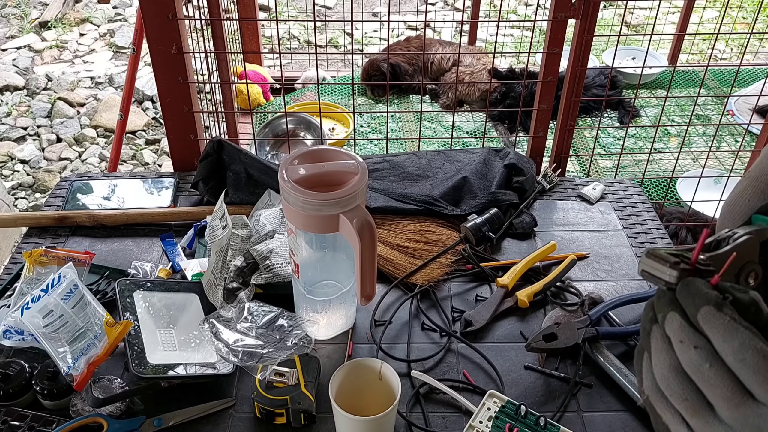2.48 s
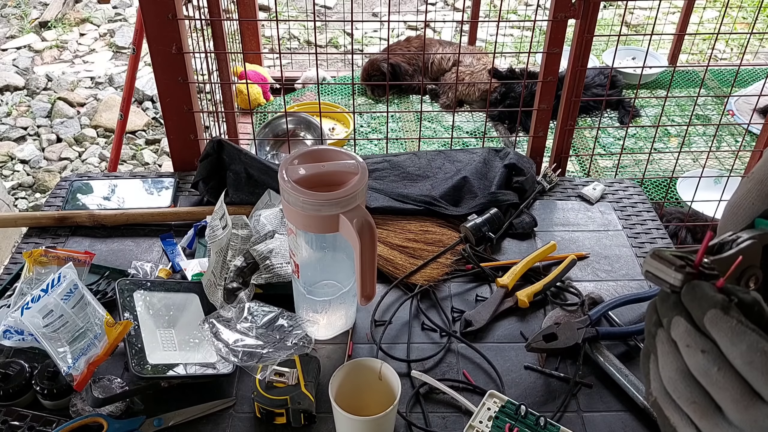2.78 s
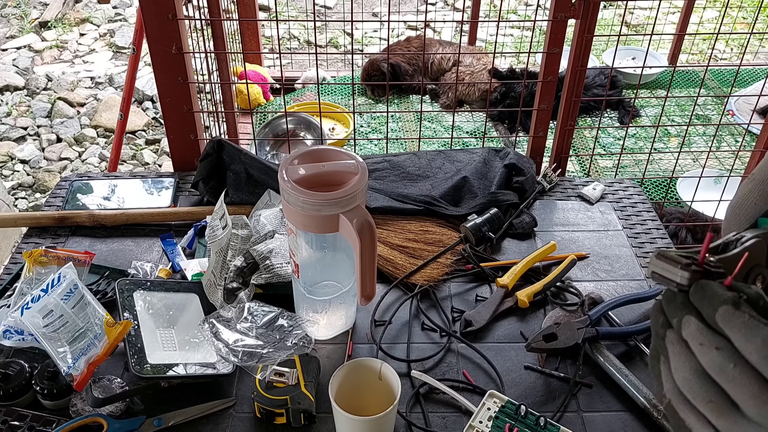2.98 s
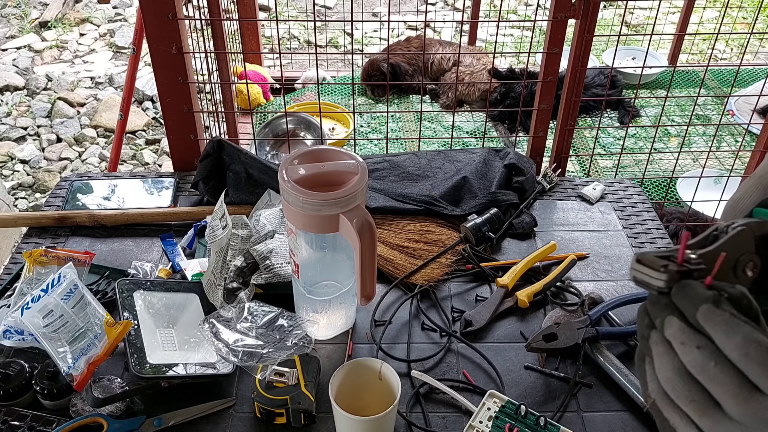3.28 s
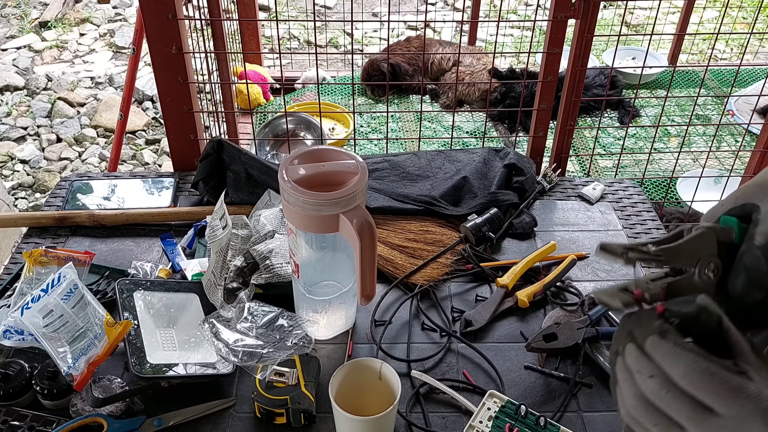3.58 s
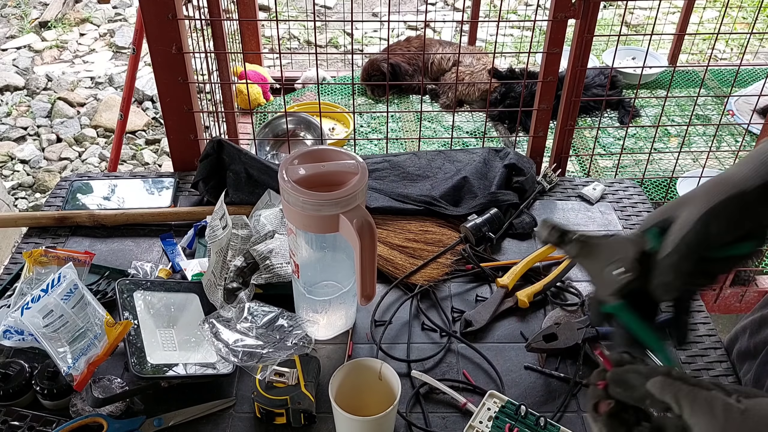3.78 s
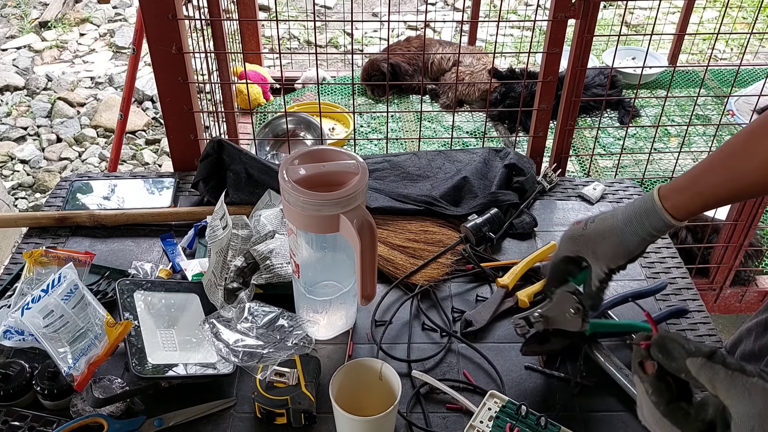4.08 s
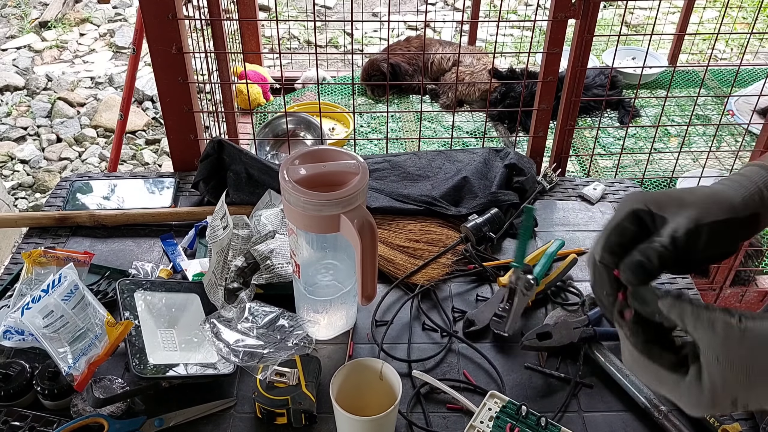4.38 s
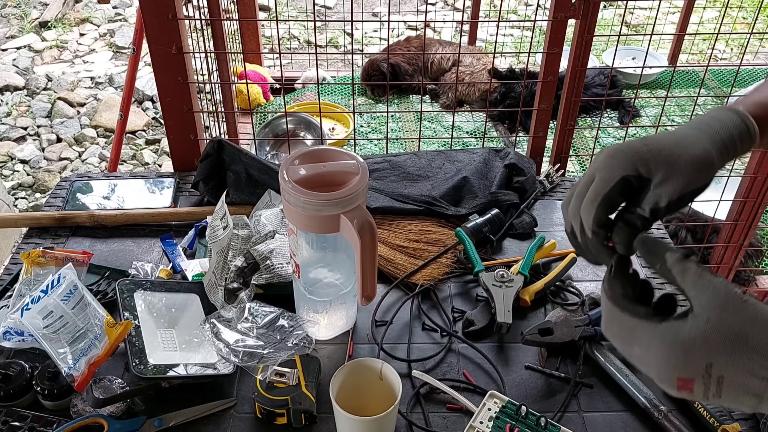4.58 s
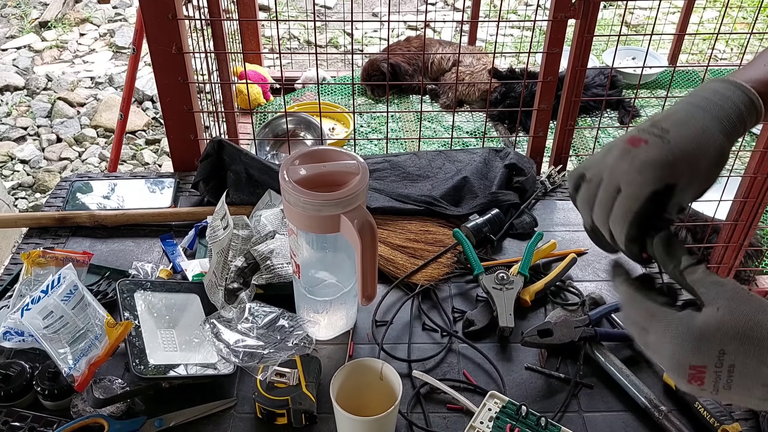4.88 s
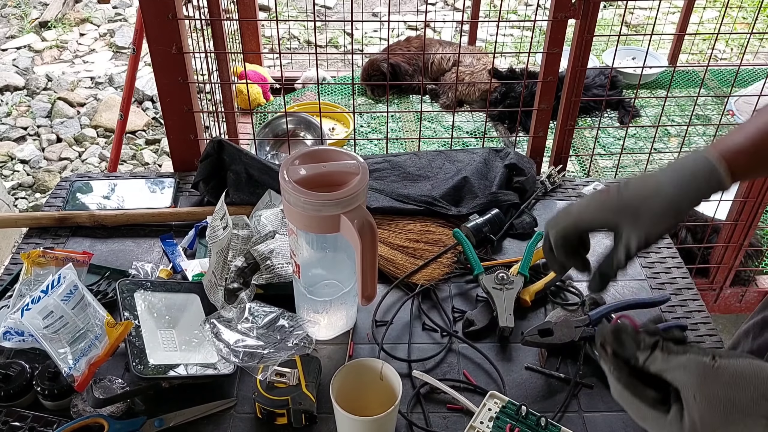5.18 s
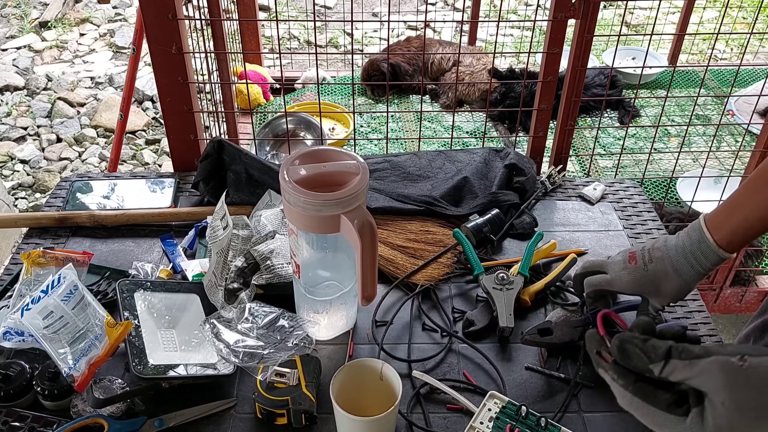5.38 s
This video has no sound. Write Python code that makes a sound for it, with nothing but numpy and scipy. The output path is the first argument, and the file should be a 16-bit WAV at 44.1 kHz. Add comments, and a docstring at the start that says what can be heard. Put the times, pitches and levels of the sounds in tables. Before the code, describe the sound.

A quiet porch outdoors, heard close in stereo, with soft distant rumble, airy wash, a faint low hum and a very high pulsing insect buzz that swells in phrases. Faint far whistles open the scene. From about 1 s a wire stripper gives tiny metallic ticks, quickening at 1.3 to 1.5, then a short tear and a loud, dry crack at 1.6 with spring jangle and bright reflections. A distant bird pips six times from 1.9 to 2.6. More clicks come at 3.3 to 3.7, then a second, more crackling snap at 3.75. At 4.2 steel touches steel lightly; at 4.34 the tool drops with a hollow plastic thud and rattle. Cable scrapes in gritty strokes at 4.4 to 4.8, with another bump at 4.8. Faint gliding calls return around 5 to 5.7, and at 5.88 pliers clink amid quick table knocks.

```python
"""A wire stripper bites and snaps twice under a porch roof, then is dropped on a cluttered plastic table.
Cracks are short noise bursts with jaw modes; blows excite table modes, a decaying thud and rattling noise.
A cable drags by stick and slip, and steel pliers clink as modal rings when they are picked up.
Behind: a bird and far calls of gliding tones, a shrill insect of pulsed noise, distant rumble, wash and hum."""
import sys
import numpy as np
from scipy import signal
from scipy.fft import rfft, irfft
from scipy.io import wavfile
from scipy.ndimage import uniform_filter1d

SR = 44100
rng = np.random.default_rng(int(sys.argv[2]) if len(sys.argv) > 2 else 0)


def generate_wav(signal):
    """Clip the signal to [-1, 1] and save it as 16-bit WAV at the path in sys.argv[1]."""
    frames = np.transpose(np.atleast_2d(signal))
    scaled = np.clip(frames, -1, 1) * 32767
    pcm = np.round(scaled).astype(np.int16)
    wavfile.write(sys.argv[1], SR, pcm)


N = 261513
T = np.arange(N) / SR
RING = T[:SR * 3 // 4]  # time axis of one decaying sound, s
EDGE_HZ = 15900  # upper band limit

# full squeezes, timed as the jaws fly open: t/s, relative levels of snap/dB, tearing/dB, spring jangle/dB
STRIPS = [(1.615, 1.5, -5, -31.5), (3.7509, 2, 1, -35.5)]
# spectrum of a sharp crack: f/Hz, relative density/dB per Hz
CRACK_SPECTRUM = [(150, 5), (600, -6), (1500, -11), (3000, -6.5), (4700, -2), (6200, 1), (9000, 1.5),
                  (12500, 5.5), (15500, 4)]
# modes of the stripper's steel jaws: f/Hz, relative level/dB, t60/s
JAW_MODES = [(1707, -13, .12), (2245, 2, .15), (2299, -9, .21), (2440, -18, .089), (2896, -21, .2),
             (3320, -14, .1), (3420, -11, .1), (4355, -12, .16), (4480, -13, .1), (5200, -16, .1),
             (6051, -18, .16), (6304, -14, .13), (6613, -10, .14), (7671, -19, .13), (8040, -17, .1),
             (9410, -18, .19), (12680, -17, .16), (14740, -24, .13)]
# modes of the plastic table top: f/Hz, relative level/dB, t60/s
TOP_MODES = [(117, -15, 0.056), (124.8, -5.5, 0.46), (157.3, -6, 0.33), (241.6, -4.5, 0.37),
             (304.5, -8, 0.26), (323.5, -5.5, 0.17), (381, -8.5, 0.22), (428, -5, 0.15), (466.3, -12, 0.26),
             (530, -28, 0.41), (571, -19.5, 0.48), (649, -11, 0.107), (702, -17, 0.16), (932, -23, 0.11),
             (1060, -43, 0.083), (1368, -40, 0.13)]


def amp(db):
    """Logarithmic level: decibels to an amplitude ratio."""
    return 10 ** (np.asarray(db) / 20)


def balance(right_db):
    """Level difference between ears: lowers the left and raises the right by right_db."""
    return amp([[-right_db], [right_db]])


def damped(t, t60):
    """Exponential decay: the amplitude falls by 60 dB in t60 seconds."""
    return np.exp(-np.log(1000) * t / t60)


def evened(x):
    """Root-mean-square normalization: scales to rms 1."""
    return x / np.sqrt(np.mean(x ** 2) + 1e-20)


def read(points, hz):
    """Logarithmic pitch scale: interpolates a table along log frequency."""
    f, value = np.transpose(points)
    return np.interp(np.log(hz + 1), np.log(f + 1), value)


def curve(rows, column=1):
    """Envelope: a gain that follows one dB column of a table in time."""
    rows = np.array(rows)
    return amp(np.interp(T, rows[:, 0], rows[:, column]))


def add(mix, s, sound):
    """Superposition: adds a sound to the mix from time s."""
    part = mix[:, max(round(s * SR), 0):][:, :sound.shape[-1]]
    part += sound[..., :part.shape[1]]


def noise(colour, size, tilt_db=0):
    """Partial coherence: coloured stereo noise whose channels agree in the bass and part in the treble."""
    # likeness of the two channels: f/Hz, correlation
    coherence = [(100, 0.94), (300, 0.77), (700, 0.46), (1500, 0.057), (4000, 0.11), (12000, 0.031)]
    hz = np.fft.rfftfreq(size, 1 / SR)
    left, other = rfft(rng.standard_normal((2, size)))
    same = np.clip(read(coherence, hz), -1, 1)
    right = same * left + np.sqrt(1 - same ** 2) * other
    gain = amp(read(colour, hz) + tilt_db * np.log2(hz + 1))  # tilt in dB per octave
    gain = gain * (hz < EDGE_HZ) * (hz > 20)
    return evened(irfft(np.array([left, right]) * gain, size))


def wander(rate):
    """Random modulation: slow sines up to rate (Hz) with random phases sum to a motion of rms 1."""
    rates = np.geomspace(rate / 10, rate, 20)
    return evened(sum(np.sin(2 * np.pi * (f * T + rng.random())) / np.sqrt(f) for f in rates))


def fade(x, t60s):
    """Frequency-dependent damping: each band dies at its own speed."""
    hz, t, bands = signal.stft(x, SR, nperseg=256)
    decay = amp(-60 * t / read(t60s, hz)[:, None])
    return signal.istft(bands * decay, SR)[1][:, :x.shape[1]]


def ring(modes, weights_db, spread):
    """Modal superposition: damped sines; spread sets how far their phases part between the ears."""
    hz, db, t60 = np.transpose(modes)[:, :, None]
    phase = spread * np.sqrt(hz / hz.max()) * rng.standard_normal((2, len(modes), 1))
    level = amp(db + weights_db[:, None])
    return (level * damped(RING, t60) * np.sin(2 * np.pi * hz * RING + phase)).sum(1)


def porch(x, build_s=0.0018):
    """Reverberation: dense bright reflections from roof and clutter swell for a moment, then die."""
    # spectrum of the reflections: f/Hz, relative density/dB
    room_colour = [(200, -14), (1200, -10), (3000, 1), (4600, 3.5), (6000, -3.5), (8000, 6), (15000, 1)]
    # decay of the reflections: f/Hz, t60/s
    room_t60 = [(300, 0.18), (2000, 0.35), (5000, 0.31), (10000, 0.2), (15000, 0.26)]
    tail = fade(noise(room_colour, size=len(RING)), room_t60) * (1 - np.exp(-RING / build_s))
    return signal.fftconvolve(x, tail / np.linalg.norm(tail[0]), axes=1)


def stripper(crack_db=-33, right_db=1.0, rise_s=0.00032, room_right_db=-0.1, fibres_per_s=400, smooth=0.44):
    """Sudden release of strain: jaws click, insulation tears in a crackle, jaws crack open, handles kick."""
    # light clicks of the jaws and hinge: t/s, relative level/dB
    jaw_clicks = [(.982, -33), (1.319, -27), (1.3417, -17.5), (1.3917, -17.5), (1.41, -15), (1.4587, -22),
                  (1.573, -25), (2.874, -38), (3.339, -25.5), (3.361, -26), (3.374, -27), (3.3847, -23),
                  (3.533, -23), (3.545, -8.5), (3.6998, -15), (3.73, -8), (4.1632, -18.5), (4.3937, -17)]
    # recoil of the handles in the glove: t/s, level/dB, f/Hz, t60/s
    recoils = [(1.615, -23, 74.6, 0.062), (1.616, -16.5, 228, 0.011), (3.531, -31.5, 282, 0.027),
               (3.532, -37.5, 1140, 0.0096), (3.5439, -31, 297, 0.031), (3.7486, -24.5, 74, 0.068)]
    click_s, click_room_db = 0.0016, -5.5
    snap_s, snap_room_db = 0.0012, 0.5
    tear_s, tear_fade_s, tear_room_db = 0.03, 0.023, -3.5  # the tear starts tear_s before the snap
    jaw_ring_db, jaw_damped_hz, jaw_damped_db = -29.5, 3500, -20.5
    out, t = np.zeros((2, N)), RING[:SR // 20]
    rise = 1 - np.exp(-t / rise_s)

    click_shape = rise * np.exp(-t / click_s)
    bursts = [(s, db, click_shape, click_room_db) for s, db in jaw_clicks]
    for s, snap_db, tear_db, _ in STRIPS:
        breaks = (rng.random(len(t)) < fibres_per_s / SR) * rng.exponential(1, len(t))
        crackle = smooth + evened(signal.fftconvolve(breaks, np.exp(-t / snap_s))[:len(t)])
        tear_shape = rise * crackle * np.exp(-t / tear_fade_s) * (t < tear_s)
        bursts.append((s - tear_s, tear_db, tear_shape, tear_room_db))
        bursts.append((s, snap_db, rise * np.exp(-t / snap_s), snap_room_db))

    # the grip on the wire damps the low modes of the jaws
    jaw_weights_db = jaw_damped_db * (np.array(JAW_MODES)[:, 0] < jaw_damped_hz)
    for s, db, shape, room_db in bursts:
        crack = noise(CRACK_SPECTRUM, size=len(t)) * evened(shape) * amp(db + crack_db)
        add(out, s, crack * balance(right_db))
        add(out, s, amp(db + jaw_ring_db) * ring(JAW_MODES, jaw_weights_db, spread=1.35))
        add(out, s, porch(crack) * amp(room_db) * balance(room_right_db))
    for s, db, hz, t60 in recoils:
        add(out, s, -amp(db) * np.sin(2 * np.pi * hz * RING) * damped(RING, t60))
    return out


def spring(t60=0.25, build_s=0.0088):
    """Dense mode cluster: coils chatter against each other, heard as narrow-band decaying noise."""
    # spectrum of the coils: f/Hz, relative density/dB per Hz
    coil_spectrum = [(1500, -31), (2300, -25), (2650, -6), (3200, -18), (3700, -11), (4300, 0), (4700, 15),
                     (5100, 6), (5700, -30), (7000, -16)]
    out = np.zeros((2, N))
    for s, _, _, db in STRIPS:
        envelope = (1 - np.exp(-RING / build_s)) * damped(RING, t60)
        add(out, s, amp(db) * noise(coil_spectrum, size=len(RING)) * envelope)
    return out


def steel(clinks, modes, room_db=-7, tick_db=-2, tick_s=0.0012):
    """Impulsive excitation of modes: tool meets tool in a short tick and the jaws ring."""
    out = np.zeros((2, N))
    for s, db in clinks:
        tick = amp(tick_db) * noise(CRACK_SPECTRUM, size=len(RING)) * np.exp(-RING / tick_s)
        clink = amp(db) * (ring(modes, np.zeros(len(modes)), spread=1.8) + tick)
        add(out, s, clink)
        add(out, s, amp(room_db) * porch(clink))
    return out


def from_right(x, count=4):
    """Interaural delay: sound from the right reaches the left microphone count samples late."""
    return np.array([np.pad(x[0], (count, 0))[:N], x[1]])


def table(clatter_db=-9, top_db=-3, thud_db=4, deep_hz=200, right_db=0.5, contact_s=0.0009, lowest_hz=92,
          soft_tilt_db=-0.47, thud_cycles=2.96, slap=0.84, slap_s=0.0039):
    """Plate impact: a blow dents and rings the top; a harder one shakes loose things louder and brighter."""
    # blows: t/s, relative level/dB, weight on the deepest modes/dB, hardness/dB, thud f/Hz
    blows = [(3.8446, -49, -8, 15.5, 1090), (4.1641, -46.5, 12.5, 14.5, 290), (4.222, -29.5, -2, 8.5, 256),
             (4.3379, -9.5, 0.5, -1, 335), (4.3443, -22.5, 10, 3, 210), (4.3539, -20, 11, 6.5, 267),
             (4.394, -22.5, -9, 4.5, 206), (4.453, -21, 3, -2, 325), (4.492, -31.5, 9.5, 2.5, 255),
             (4.5526, -39, 4, -4, 243), (4.611, -26.5, 0, -10.5, 241.7), (4.654, -27.5, 11, 2, 174),
             (4.685, -40, -2, 10.5, 298), (4.8047, -15.5, -11, -5, 254), (4.9042, -40, -18, 6, 261),
             (5.09, -48.5, 15, 5.5, 280), (5.478, -39, 0, -10.5, 171), (5.591, -39, 5, -10, 186),
             (5.692, -42.5, -14, 6.5, 440), (5.795, -40, -5, -7, 272), (5.879, -21, -19, 4, 215),
             (5.8824, -19, 4, 5, 190), (5.907, -25.5, -13, 10, 184), (5.924, -19, -10, 8, 182)]
    # spectrum of the loose things on the table: f/Hz, relative density/dB per Hz
    clatter_spectrum = [(50, -23), (110, -13.5), (300, -3), (720, -5), (1000, -12), (1400, -13),
                        (2500, -21), (4000, -25), (6000, -34.5), (10000, -42.5), (15500, -47)]
    # decay of the loose things: f/Hz, t60/s
    clatter_decay = [(100, 1), (500, 0.25), (2000, 0.24), (8000, 0.29)]
    # above hard_from_db each dB of hardness tilts the clatter up by brighten dB per octave
    hard_from_db, brighten = 5.5, 0.62
    out, mode_hz = np.zeros((2, N)), np.array(TOP_MODES)[:, 0]
    contact = 1 - np.exp(-(RING / contact_s) ** 2)  # rubber grips and gloves land softly
    for s, db, deep_db, hard_db, thud_hz in blows:
        top = amp(top_db) * ring_top(mode_hz, deep_hz, deep_db)
        thud_decay = np.exp(-thud_hz * RING / thud_cycles)
        thud = amp(thud_db) * np.sin(2 * np.pi * thud_hz * RING) * thud_decay
        tilt_db = soft_tilt_db + brighten * max(hard_db - hard_from_db, 0)
        clatter = fade(noise(clatter_spectrum, size=len(RING), tilt_db=tilt_db), clatter_decay)
        clatter = clatter * (1 + slap * np.exp(-RING / slap_s))
        add(out, s, amp(db) * contact * (amp(clatter_db + hard_db) * clatter - top - thud))
    # a small top sends out no deep bass
    radiated = signal.sosfilt(signal.butter(3, lowest_hz, "high", fs=SR, output="sos"), out)
    return radiated * balance(right_db)


def ring_top(mode_hz, deep_hz, deep_db):
    """Selective excitation: the modes of the top below deep_hz are weighted by deep_db."""
    return ring(TOP_MODES, (mode_hz < deep_hz) * deep_db, spread=0.61)


def cable(slips_per_s=250, slip_s=0.0014, smooth=0.94, body_db=6):
    """Stick-slip friction: tiny bursts over the ribbed top also set the top rumbling."""
    # strokes of the drag: t/s, relative level/dB
    drag_level = [(4.44, -58), (4.47, -34.5), (4.54, -53), (4.62, -48), (4.655, -39.5), (4.69, -37.5),
                  (4.73, -42), (4.77, -48), (4.97, -64)]
    # spectrum of the scraping: f/Hz, relative density/dB per Hz
    drag_spectrum = [(290, -29), (500, 4), (629, -8.5), (876, -9.5), (1130, -8), (2290, -13), (9790, -33.5),
                     (11500, -29), (15500, -42)]
    slips = (rng.random(N) < slips_per_s / SR) * rng.exponential(1, N)
    grain = evened(smooth + signal.lfilter([1], [1, -np.exp(-1 / (slip_s * SR))], slips))
    stroke = grain * curve(drag_level) * (T > drag_level[0][0]) * (T < drag_level[-1][0])
    top = ring(TOP_MODES, np.zeros(len(TOP_MODES)), spread=0.86)
    push = (stroke * rng.standard_normal(N))[None]
    body = signal.fftconvolve(push, top / np.linalg.norm(top[0]), axes=1)[:, :N]
    return noise(drag_spectrum, size=N) * stroke + amp(body_db) * body


def bird(length_s=0.031, glide=0.044, low_hz=3150, low_db=-7, gap_s=0.05, fall=0.094, room_db=-8):
    """Frequency glide: short rising pips of a distant bird, each followed by a softer falling note."""
    # rising pips: t/s at the middle, level/dB, middle f/Hz
    pips = [(1.88, -69.5, 3640), (2.043, -66.5, 3720), (2.197, -62.5, 3740), (2.341, -69, 3820),
            (2.475, -66.5, 3850), (2.632, -61.5, 3760)]
    out, t = np.zeros((2, N)), np.arange(0, length_s, 1 / SR)
    along, swell = t / length_s - .5, np.hanning(len(t))
    for s, db, hz in pips:
        rising = np.sin(2 * np.pi * np.cumsum(hz * (1 + glide * along)) / SR)
        falling = np.sin(2 * np.pi * np.cumsum(low_hz * (1 - fall * along)) / SR)
        start = s - length_s / 2
        add(out, start, amp(db) * swell * rising)
        add(out, start + gap_s, amp(db + low_db) * swell * falling)
    return out + amp(room_db) * porch(out)[:, :N]


def far_calls(sag=0.0282, blur=0.0267):
    """Frequency modulation: faint, slightly falling far whistles, their pitch blurred by the distance."""
    # whistles: t/s, length/s, level/dB, f/Hz
    whistles = [(.0, 0.13, -62, 1820), (.0, 0.12, -68, 2950), (.25, 0.11, -70, 2930),
                (0.508, 0.14, -65, 2920), (1.05, .25, -64, 1210), (4.909, .35, -65, 2280),
                (5.103, 0.54, -63.5, 1766), (5.308, 0.42, -63, 2045)]
    out = np.zeros((2, N))
    for s, length, db, hz in whistles:
        size = int(length * SR)
        waver = blur * evened(uniform_filter1d(rng.standard_normal((2, size)), size=300))
        turns = np.cumsum(hz * (1 + sag * np.linspace(.5, -.5, size) + waver), axis=1) / SR
        add(out, s, amp(db) * np.sqrt(np.hanning(size)) * np.sin(2 * np.pi * turns))
    return out


def insect(pulse_hz=121, depth=0.38, level_db=4, right_db=1):
    """Amplitude modulation: a shrill buzz in long swelling phrases, pulsed by fast wing strokes."""
    # phrases: start t/s, end t/s, relative level at the end/dB
    phrases = [(-.5, 0.96, -62), (1.443, 3.237, -64.5), (3.803, 5.338, -66)]
    # spectrum of the buzz: f/Hz, relative density/dB per Hz
    buzz_spectrum = [(9500, -55.5), (10200, -11), (10700, 0.5), (11150, 10), (11500, 0), (11900, -15),
                     (13000, -28), (14000, -62)]
    # each phrase swells, then drops back to a faint buzz
    swell_db_per_s, edge_s, between_db = 1.5, 0.13, -74
    turns = np.cumsum(pulse_hz * (1 + 0.0076 * wander(5.24))) / SR
    pulses = evened(1 + depth * np.cos(2 * np.pi * turns))
    effort = amp(between_db)
    for start, end, db in phrases:
        gate = np.clip(np.minimum(T - start, end + edge_s - T) / edge_s, 0, 1)
        effort = np.maximum(effort, gate * amp(db + swell_db_per_s * (T - end)))
    return noise(buzz_spectrum, size=N) * pulses * effort * amp(level_db) * balance(right_db)


def outdoors(split_hz=450, rumble_db=2, wash_db=-2.5):
    """Band-split noise and tones: lumpy far rumble, a soft wash above it and a wavering hum."""
    # spectrum of the yard: f/Hz, relative density/dB per Hz
    air_spectrum = [(25, -16.5), (50, 1.5), (125, -1), (175, -11.5), (250, -10), (390, -18.5), (560, -14.5),
                    (800, -21.5), (1750, -29.5), (2400, -31), (3000, -35), (4200, -43), (6400, -46.5),
                    (7600, -42.5), (9500, -46.5), (15500, -56)]
    # course of the yard: t/s, relative rumble level/dB, relative wash level/dB
    air_level = [(0.0, -49, -53.5), (0.65, -49, -59), (1.5, -49.5, -54), (1.85, -55, -61),
                 (2.9, -52, -59.5), (3.3, -46.5, -54.5), (3.68, -47, -56), (4.0, -54.5, -58.5),
                 (4.8, -47.5, -52.5), (5.3, -50.5, -61.5), (5.93, -50.5, -56)]
    # partials of the hum: mean f/Hz, mean rms level/dB
    hum_partials = [(70, -65.5), (123.8, -58.5), (247.6, -71), (543.7, -75)]
    air = noise(air_spectrum, size=N)
    low = signal.sosfiltfilt(signal.butter(2, split_hz, fs=SR, output="sos"), air)
    rumble = evened(low) * curve(air_level) * amp(rumble_db + 0.19 * wander(23))
    wash = evened(air - low) * curve(air_level, column=2) * amp(wash_db + 0.15 * wander(3.6))
    hum = 0
    for hz, db in hum_partials:
        level = amp(db + 2 * wander(1.6)) * np.sqrt(2)
        turns = np.cumsum(hz * (1 + 0.01474 * wander(7.7))) / SR
        hum = hum + level * np.sin(2 * np.pi * turns)
    return rumble + wash + hum


def scene():
    """Superposition of sources: the work at the table over the sounds of the yard."""
    # the stripper's jaws touching other tools: t/s, relative level/dB
    jaw_clinks = [(4.2218, -30), (4.338, -48)]
    # pliers knocked as the hand takes them: t/s, relative level/dB
    plier_clinks = [(5.878, -24.5)]
    # modes of the pliers: f/Hz, relative level/dB, t60/s
    plier_modes = [(665, 1, .18), (956, -3, .092), (1290, -5, .16), (2130, -9, .16), (3480, -8, .1),
                   (3655, -13, .2), (4330, -11, .12), (5286, -12, .18), (6035, -16, .25), (6615, 0, .085),
                   (9388, -11, .21), (10520, -19, .11), (12740, -17, .17), (14270, -20, .15)]
    tools = stripper() + spring()
    tools = tools + steel(jaw_clinks, JAW_MODES, room_db=-10.5)
    tools = tools + steel(plier_clinks, plier_modes, room_db=-6)
    work = from_right(tools) + table() + cable()
    return work + bird() + far_calls() + insect() + outdoors()


def record(dry, low_cut_hz=36):
    """Band limitation: the microphone loses the deepest bass, then a steep low-pass cuts the top."""
    thinned = signal.sosfilt(signal.butter(2, low_cut_hz, "high", fs=SR, output="sos"), dry)
    low_pass = signal.firwin(255, EDGE_HZ, window=("kaiser", 8), fs=SR)
    return signal.oaconvolve(thinned, low_pass[None], "same")


dry = scene()
out = record(dry)
generate_wav(out)
```